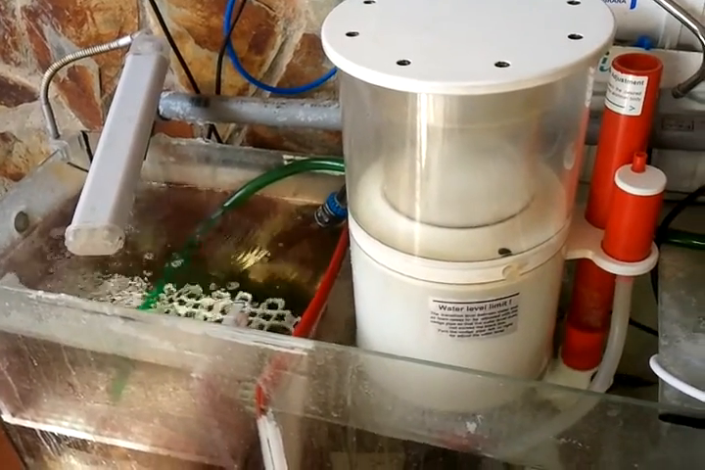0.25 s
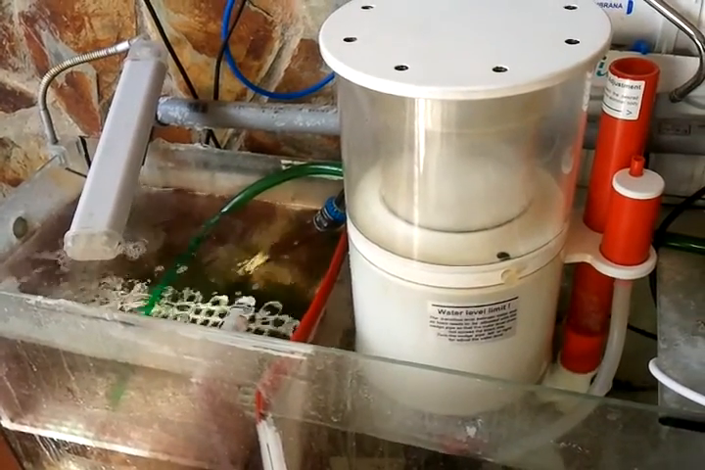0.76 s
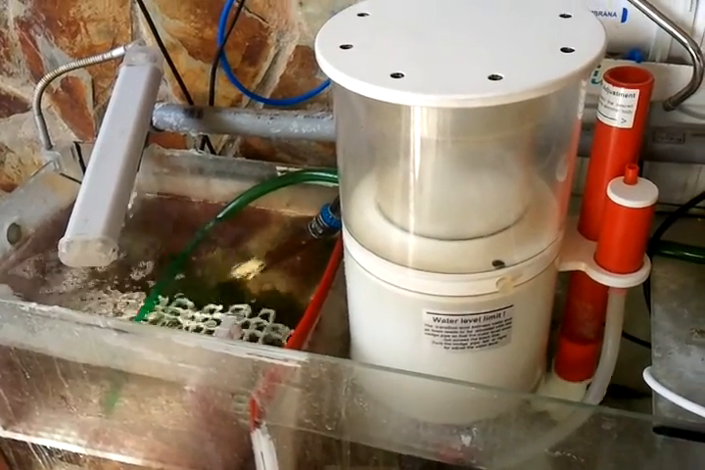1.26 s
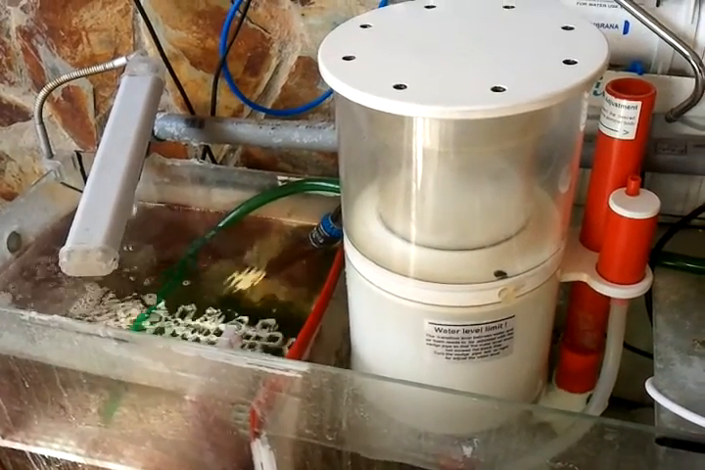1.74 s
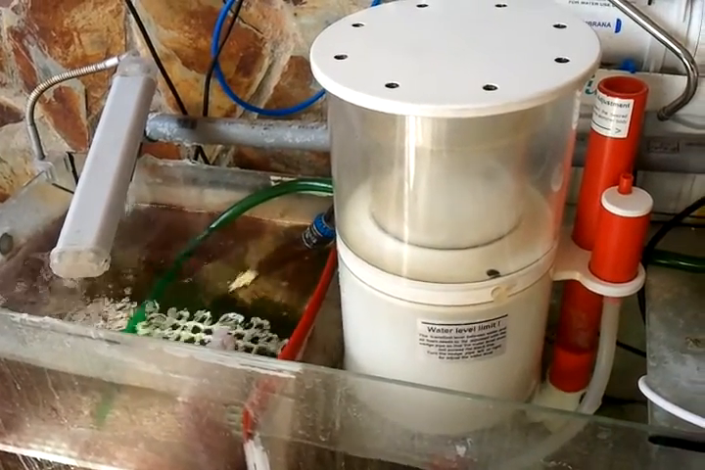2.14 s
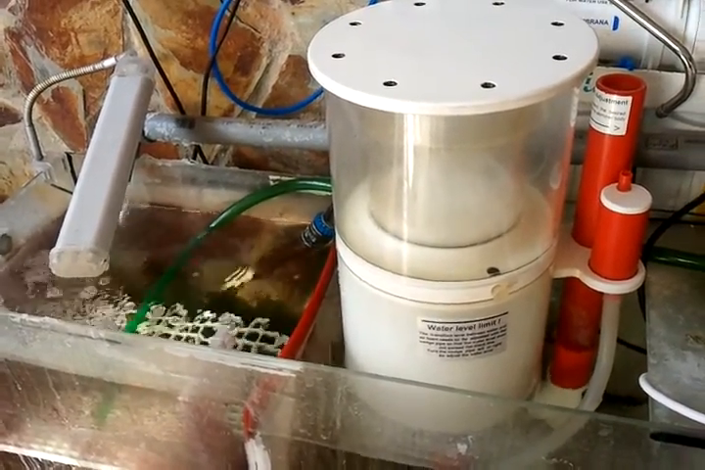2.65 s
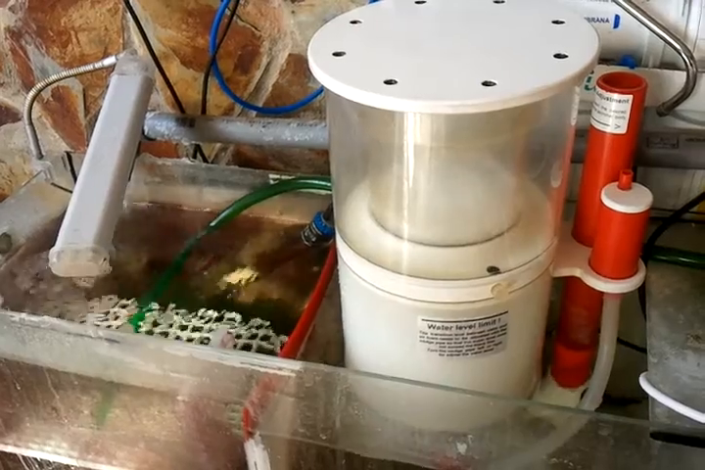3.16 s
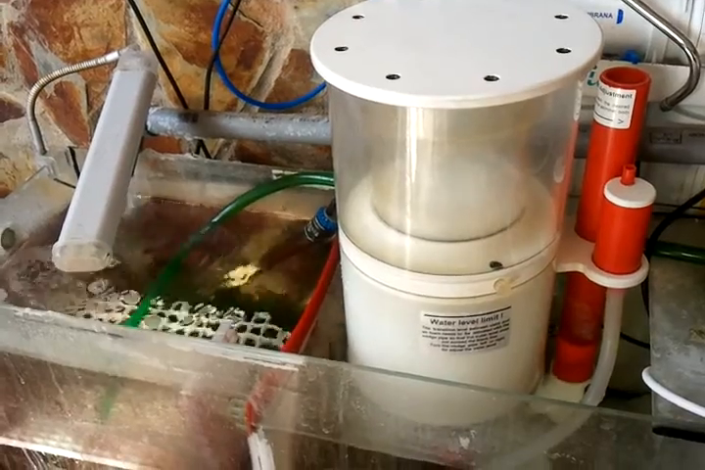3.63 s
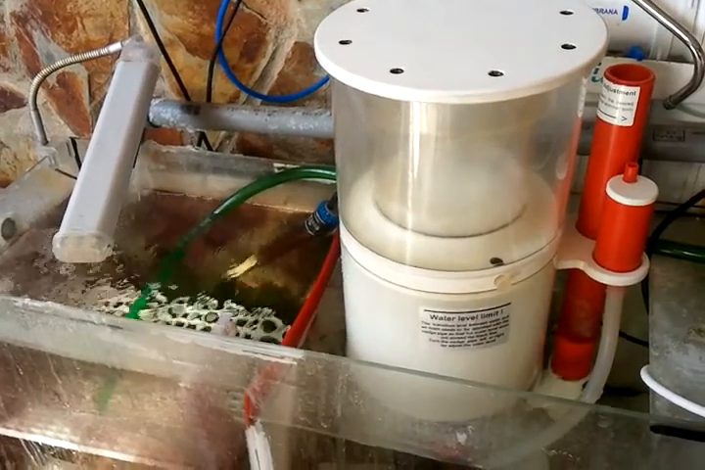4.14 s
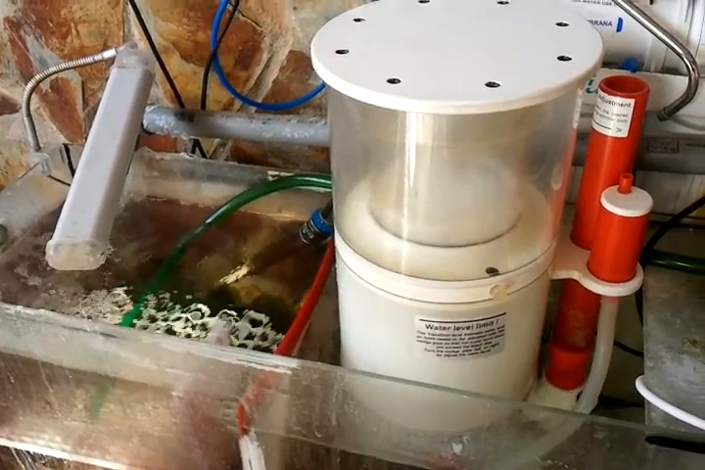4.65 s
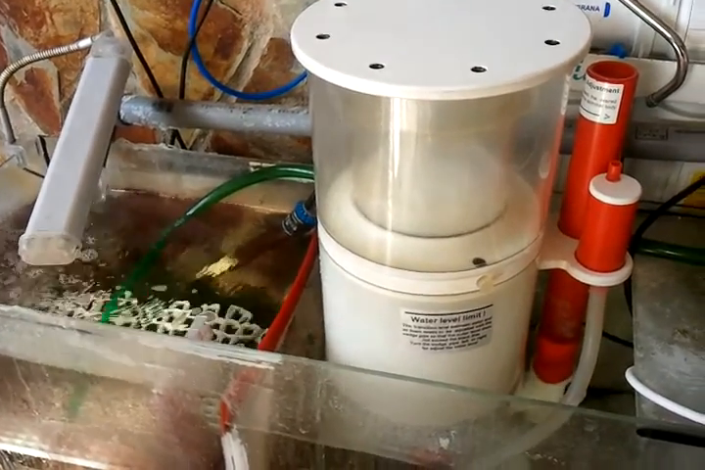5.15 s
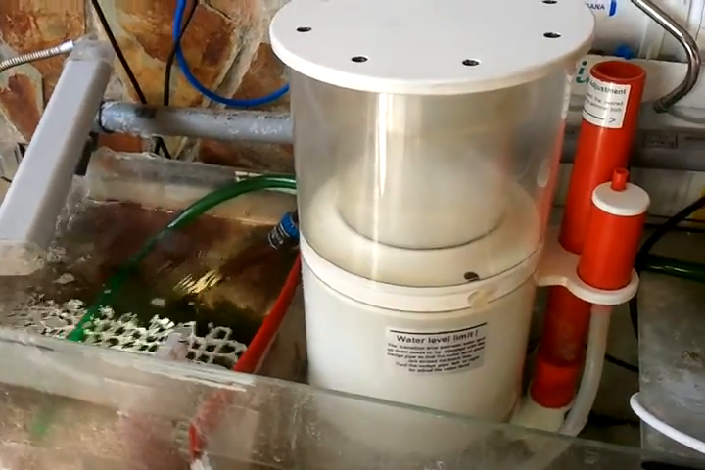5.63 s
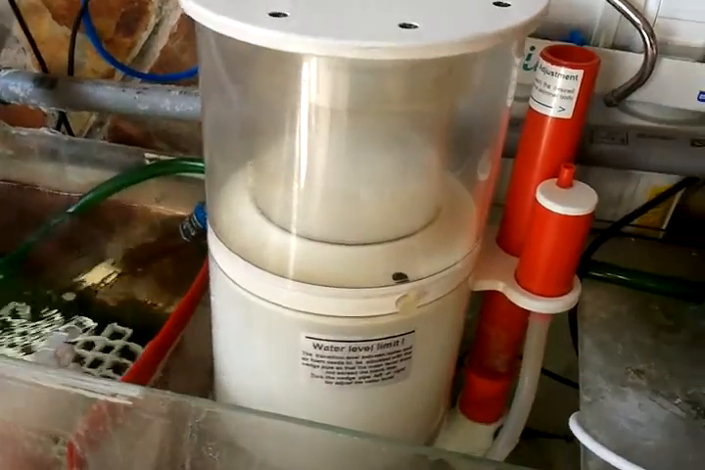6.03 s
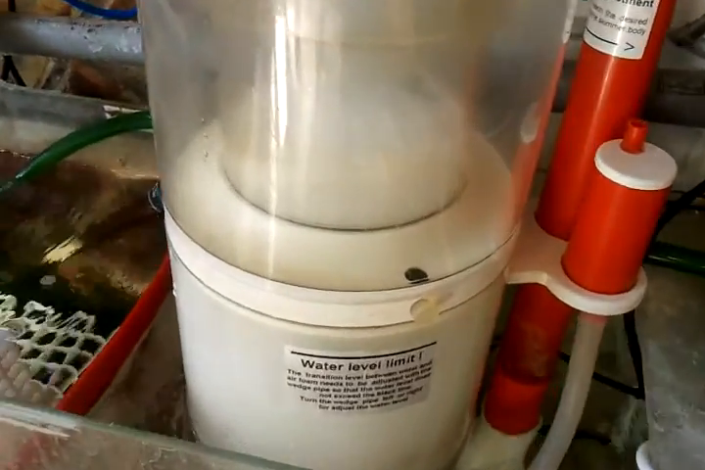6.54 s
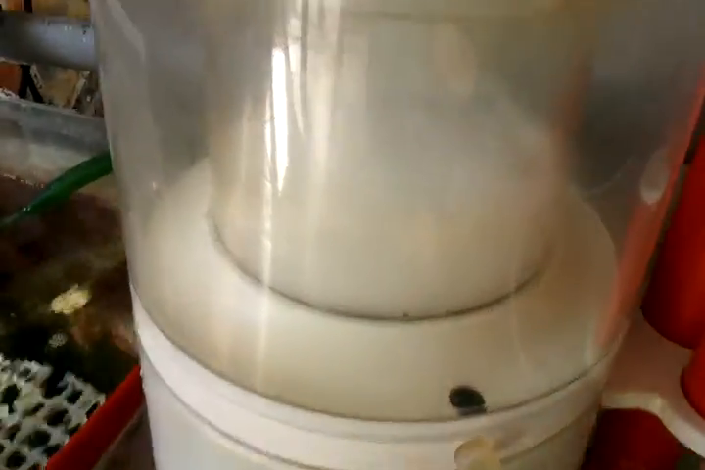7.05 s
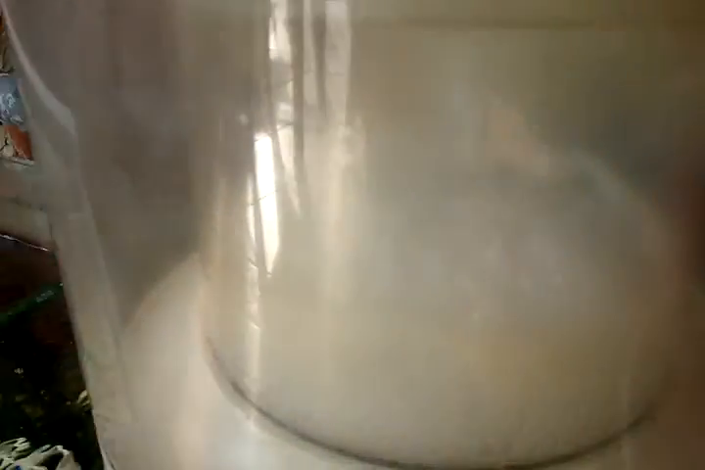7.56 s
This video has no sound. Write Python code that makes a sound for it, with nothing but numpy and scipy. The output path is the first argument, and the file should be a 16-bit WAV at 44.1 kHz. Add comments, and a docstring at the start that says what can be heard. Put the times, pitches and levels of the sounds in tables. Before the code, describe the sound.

Water pours continuously from a drain pipe into an aquarium sump, gurgling in hollow mid-pitched bubbles while bright droplets tick and foam fizzes. A mains pump hums low beneath, with soft cabinet rumble. The microphone stays about a metre away, then moves in towards the foaming column, raising hum, water wash and a hollow roar. Small, hard-walled room.

```python
"""Water gurgles from a drain pipe into an aquarium sump in a small tiled room: air pockets ring as bubbles.
Droplets tick (noise puffs) and trap tiny bubbles; a few only snap. Rush, fizz and foam are patchy noise.
A mains pump adds harmonics, an impeller drone and a panel tone; the cabinet rumbles as low noise.
The microphone drifts nearer the foaming column, faster towards the end: water beds, rumble, pump hum
and panel grow, and a hollow roar comes up."""
import sys
import numpy as np
from scipy import signal
from scipy.fft import rfft, irfft, next_fast_len
from scipy.io import wavfile
from scipy.ndimage import uniform_filter1d, map_coordinates

SR = 44100
rng = np.random.default_rng(int(sys.argv[2]) if len(sys.argv) > 2 else 0)


def unload_wav(signal):
    """Save mono or channel-first audio to the path in sys.argv[1] as 16-bit WAV at rate SR, clipped to [-1, 1]."""
    wavfile.write(
        sys.argv[1],
        SR,
        np.round(np.clip(np.atleast_2d(signal).T, -1, 1) * 32767).astype(np.int16),
    )


N = 343539

# air pockets at the pipe mouth: (time [s], peak level [dB], pitch [Hz])
AIR_POCKETS = [(.046, -31.5, 1024), (.0463, -36.5, 1500), (.322, -35, 955), (.4, -30, 810),
               (.484, -31, 833), (.5771, -35.5, 1270), (.578, -37, 2070), (.66, -38.5, 900),
               (.721, -41, 966), (.756, -37.5, 1040), (.782, -38, 1035), (.82, -36.5, 956),
               (.857, -33.5, 972), (.8914, -37, 2150), (.907, -34.5, 766), (.972, -36.5, 767),
               (1.3738, -32, 2420), (1.463, -37, 793), (1.786, -37.5, 850), (1.836, -38.5, 965),
               (1.8991, -35, 1530), (1.905, -33, 850), (1.996, -34.5, 790), (2.097, -37, 715),
               (2.278, -35, 794), (2.2822, -36.5, 1660), (2.3421, -40.5, 1520), (2.55, -39, 2040),
               (2.651, -33.5, 886), (2.6514, -36, 2344), (2.855, -36.5, 746), (2.871, -34.5, 778),
               (2.974, -36.5, 1255), (3.035, -34, 820), (3.095, -36, 730), (3.473, -39, 2030),
               (4.086, -27.5, 820), (4.457, -37, 1150), (4.544, -34, 730), (4.562, -35.5, 800),
               (4.693, -33.5, 754), (4.734, -36.5, 856), (4.759, -36, 844), (4.877, -38.5, 826),
               (4.923, -34.5, 923), (5.135, -37, 1148), (5.205, -30.5, 1000), (5.4774, -35.5, 1302),
               (5.88, -34, 1140), (5.982, -34.5, 1330), (5.9838, -33, 1490), (6.068, -33, 1240),
               (6.248, -31.5, 1085), (6.399, -34.5, 960), (6.56, -33, 970), (6.5829, -38, 1920),
               (6.961, -38.5, 923), (7.016, -34, 850), (7.137, -34.5, 835), (7.279, -30, 890),
               (7.293, -39, 1010), (7.36, -39, 860), (7.5547, -36.5, 1783), (7.6046, -30, 1810),
               (7.62, -33.5, 1790)]


def gurgling():
    """Air pockets pinch off under the pipe mouth and ring; the water closing behind them sloshes."""
    time_s, peak_db, pitch_hz = np.transpose(AIR_POCKETS)
    cycles = 6.9 * (pitch_hz / 800) ** 0.88  # small pockets ring for more cycles
    pockets = bubbles(time_s - .002, peak_db, pitch_hz, cycles, rise=0.042)
    slosh_band = [(300, -20.0), (600, 14), (1800, 12.0), (3500, -2.0), (9000, -6.5)]  # (frequency [Hz], gain [dB])
    puffs = bursts(time_s, peak_db - 7, t60_s=0.031, size=1400)
    slosh = filtered(puffs, lambda hz: amp(along(slosh_band, hz)))
    followers = spray(time_s, peak_db, pitch_hz, cycles=12.8, spread=0.29, count=3)
    small = swarm(count=700, mid_hz=866.0, spread=0.171, db=-49.5, scatter_db=2.0, cycles=7.65, size=900)
    smaller = swarm(count=400, mid_hz=1701, spread=0.308, db=-50, scatter_db=0.0, cycles=20.3, size=700)
    return pockets + slosh + followers + small + smaller


# droplets that trap a bubble: (time [s], peak level [dB], bubble pitch [Hz])
DROPLETS = [(0.045, -30, 7240), (0.151, -27.5, 8000), (.18, -26, 7570), (.377, -22.5, 7680),
            (0.4045, -26, 3800), (0.4983, -32.5, 3900), (0.5281, -21.5, 7340), (0.642, -30, 6200),
            (0.6655, -27.5, 6100), (0.7103, -32.5, 4120), (.808, -35, 7300), (.823, -30.5, 7630),
            (.894, -28.5, 7550), (.925, -25, 7730), (1.0569, -25, 4160), (1.118, -26.5, 7530),
            (1.193, -25, 7300), (1.2159, -20.5, 4110), (1.3602, -22, 3810), (1.361, -24.5, 6100),
            (1.3717, -25, 4280), (1.4432, -23.5, 5570), (1.541, -31.5, 6500), (1.5617, -28.5, 6400),
            (1.626, -26, 4820), (1.8983, -31, 4080), (1.972, -33, 7800), (1.9826, -35.5, 4000),
            (1.995, -29.5, 6370), (2.21, -35, 3600), (2.26, -33, 6200), (2.583, -23.5, 7730),
            (2.7092, -31.5, 7840), (2.7408, -27.5, 6760), (2.822, -29.5, 5870), (2.9742, -22, 7720),
            (3.3228, -39, 3830), (3.335, -33, 3700), (3.362, -29.5, 7600), (3.65, -35.5, 3670),
            (4.1069, -29.5, 5800), (4.14, -24.5, 3730), (4.274, -30, 5000), (4.295, -30, 6700),
            (4.4294, -26.5, 7240), (4.491, -33, 3270), (4.692, -31.5, 7430), (5.0343, -26.5, 7570),
            (5.3381, -30, 4070), (5.364, -21, 6620), (5.4003, -30, 6460), (5.439, -26.5, 5870),
            (5.478, -30, 5400), (5.538, -22, 7500), (5.644, -25.5, 7830), (5.751, -32.5, 3550),
            (5.7602, -23.5, 7560), (5.793, -23, 6300), (5.9698, -27.5, 6500), (5.9818, -24.5, 5400),
            (6.0267, -28.5, 4650), (6.0363, -29.5, 4370), (6.1424, -20, 7940), (6.1614, -26.5, 5000),
            (6.224, -28.5, 3780), (6.2332, -27, 4900), (6.2876, -24, 4800), (6.3692, -25, 5370),
            (6.4047, -29, 5800), (6.584, -28, 4930), (6.6035, -31, 3720), (6.6275, -31.5, 3920),
            (6.6473, -25.5, 5360), (6.773, -31, 5000), (6.983, -31, 5500), (7.1328, -29, 5630),
            (7.222, -30, 7400), (7.363, -37, 6800), (7.405, -31.5, 7300)]


def dripping():
    """Droplets tick and trap ringing bubbles; tiny bubbles and foam cells pop all the while at chance moments."""
    time_s, peak_db, pitch_hz = np.transpose(DROPLETS)
    tick = bursts(time_s, peak_db, t60_s=0.019, size=900)
    tick = filtered(tick, lambda hz: np.clip(hz / 3500, 0, 1) ** 2)
    trapped = bubbles(time_s - .0006, peak_db, pitch_hz, 9.9, rise=0.021, size=400)
    followers = spray(time_s, peak_db - 3.5, pitch_hz, cycles=21.6, spread=0.5, count=6)
    tiny = swarm(count=2500, mid_hz=5960, spread=0.376, db=-45, scatter_db=3.5, cycles=5.66, size=200)
    tiny = tiny * amp(2.3 * splashing_db())
    foam_pops = swarm(count=900, mid_hz=8130, spread=0.061, db=-39, scatter_db=1, cycles=5.9, size=200)
    return tick + trapped + followers + tiny + foam_pops


# droplets that burst without a bubble: (time [s], peak level [dB])
SNAP_HITS = [(0.0455, -33), (1.2147, -23), (1.265, -33), (3.134, -30), (4.8095, -20), (5.9838, -19),
             (7.466, -26)]


def snapping():
    """A bursting droplet gives a pulse of about one 4 kHz cycle."""
    time_s, peak_db = np.transpose(SNAP_HITS)
    return bubbles(time_s, peak_db, np.full(len(time_s), 4000), 2.2, rise=.5, size=100)


# noise spectra of the stream's body, fizz and bursting foam: (frequency [Hz], relative density [dB per Hz])
RUSH_SPECTRUM = [(150, -57), (330, -8.5), (480, -1.5), (820, -2.5), (1200, -4.5), (2000, -5), (2700, -13.5),
                 (3600, -25.5), (8000, -120)]
FIZZ_SPECTRUM = [(1200, -69.5), (2500, -2.5), (3100, -2.5), (3880, 3), (4600, -2.5), (6300, 3), (7100, -4),
                 (8600, -8.5), (9600, -11)]
FOAM_SPECTRUM = [(5000, -45), (7000, -15), (7600, 12), (8200, 7), (9600, -18)]


def stream():
    """Body of the stream, fine fizz and foam hiss: noise beds sharing one random surge."""
    surge_db = wobble(28)
    rush_db = bed_db(-52, near=0.91, splash=.3) + surge_db
    fizz_db = bed_db(-49.5, near=0.69, splash=0.81) + surge_db
    foam_db = bed_db(-58, near=2.05, splash=.2) + 0.46 * surge_db + 0.43 * wobble(40)
    rush = amp(rush_db) * noise(RUSH_SPECTRUM, patchy_db=1.3)
    fizz = amp(fizz_db) * noise(FIZZ_SPECTRUM, patchy_db=1.57)
    foam = amp(foam_db) * noise(FOAM_SPECTRUM, patchy_db=4.0)
    return rush + fizz + foam


# hollow roar inside the column: (frequency [Hz], relative density [dB per Hz])
COLUMN_SPECTRUM = [(250, -60.5), (390, -8.5), (450, 0), (540, -8), (800, -60)]


def column_roar():
    """Narrow noise near 450 Hz that grows steeply as the microphone nears."""
    return amp(bed_db(-73.5, near=3.2, splash=0)) * noise(COLUMN_SPECTRUM, patchy_db=1.5)


# how hard the stream splashes: (time [s], level [dB])
SPLASH_CURVE = [(0, 0.5), (.45, 0.5), (1.4, 0.7), (1.8, -1.5), (2.85, 0), (3.6, -1.5), (4.6, 0),
                (5.3, -0.3), (6.15, 0), (6.7, -1.4), (7.79, 2.1)]


def splashing_db():
    """Splash strength per sample; each layer takes its own share."""
    return curves(SPLASH_CURVE)[0]


# microphone to foaming column: (time [s], distance [m])
MIC_DISTANCE = [(0, 0.94), (5.2, 0.86), (6.3, 0.7), (7, 0.56), (7.79, 0.46)]


def nearness_db():
    """Inverse-distance gain from coming closer than 1 m."""
    return -20 * np.log10(curves(MIC_DISTANCE)[0])


def bed_db(rms_db_at_1m, near, splash):
    """Bed level with its shares of the nearness gain and of the splashing."""
    return rms_db_at_1m + near * nearness_db() + splash * splashing_db()


# pump harmonics at 1 m: (multiple of mains [1], rms level [dB])
HUM_HARMONICS = [(2, -57.5), (3, -64), (4, -57.5), (6, -60), (7, -67), (9, -71), (13, -67), (23, -66)]


def mains_hum():
    """Harmonics of 50 Hz mains, each wavering in level and phase, louder from nearby."""
    mains_hz, t = 50, np.arange(N) / SR
    hum = np.zeros(N)
    for multiple, rms_db in HUM_HARMONICS:
        phase = 2 * np.pi * multiple * mains_hz * t + 0.27 * wobble(3.3)
        hum += amp(rms_db + 2.2 * wobble(2.755)) * np.sin(phase)
    return np.sqrt(2) * amp(0.78 * nearness_db()) * hum


# impeller under changing load: (time [s], pitch [Hz], rms level [dB])
IMPELLER = [(0, 65.45, -72), (.6, 64, -45.5), (2, 63, -51.5), (2.6, 60.64, -53), (5.8, 60, -50),
            (6.4, 60.8, -45.5), (6.9, 59.2, -54), (7.3, 60.8, -44.5), (7.79, 60, -55)]


def impeller_drone():
    """One sine follows the impeller's gliding pitch and level."""
    pitch_hz, rms_db = curves(IMPELLER)
    phase = 2 * np.pi * np.cumsum(pitch_hz) / SR + 0.4 * wobble(2.5)
    return np.sqrt(2) * amp(rms_db + 0.6 * wobble(1.1)) * np.sin(phase)


def panel_buzz():
    """A panel sounds as a wavering 145.5 Hz sine, louder from nearby."""
    phase = 2 * np.pi * 145.5 * np.arange(N) / SR + 0.69 * wobble(5.4)
    rms_db = -59.5 + 2.1 * wobble(4) + 1.5 * nearness_db()
    return np.sqrt(2) * amp(rms_db) * np.sin(phase)


# cabinet: (frequency [Hz], relative density [dB per Hz])
RUMBLE_SPECTRUM = [(12, -16.5), (22, -10.5), (32, -3), (50, -1.5), (80, -9.5), (120, -13), (146, -10.5),
                   (175, -16), (260, -15), (380, -23), (600, -30.5), (1500, -120)]


def cabinet_rumble():
    """Low noise, strongest around 30-50 Hz."""
    return amp(bed_db(-45, near=0.62, splash=.05)) * noise(RUMBLE_SPECTRUM, patchy_db=0.5)


# reverberation: (frequency [Hz], t60 [s])
ROOM_T60 = [(500, 0.18), (2500, 0.42), (8000, 0.017)]


def room(x):
    """Hard walls answer with a decaying noise tail, drawn anew every quarter second."""
    out, step = np.zeros(N + SR), SR // 4
    for start in range(0, N, step):
        hz, t, z = signal.stft(rng.standard_normal(SR // 3), SR, nperseg=256)
        decay_db = -60 * t / along(ROOM_T60, hz)[:, None]
        tail = signal.istft(z * amp(decay_db), SR, nperseg=256)[1]
        wet = signal.fftconvolve(x[start:start + step], tail / np.linalg.norm(tail))
        out[start + 100:][:len(wet)] += wet  # 100 samples of pre-delay
    return out[:N]


def bubbles(time_s, peak_db, hz, cycles, rise, size=1400):
    """Each bubble swells, rings for some cycles while its pitch climbs, and dies."""
    t = np.arange(size) / SR
    lives = t * (hz / cycles)[:, None]  # age in lives
    shape = (np.e * 3 * lives * np.exp(-3 * lives)) ** 2.0
    ring = np.sin(2 * np.pi * hz[:, None] * t * (1 + rise * lives / 2))
    return placed(time_s, amp(peak_db)[:, None] * shape * ring)


def bursts(time_s, db, t60_s, size):
    """Short puffs of white noise: quick onset, exponential decay."""
    t = np.arange(size) / SR
    shape = amp(-60 * t / t60_s) * (1 - np.exp(-t / 0.00094))
    return placed(time_s, amp(db)[:, None] * shape * rng.standard_normal((len(time_s), size)))


def placed(time_s, waves):
    """Sum the rows of waves, each starting at its time."""
    size = waves.shape[1]
    at = (time_s * SR).astype(int)[:, None] + np.arange(size)
    return np.bincount(at.ravel(), waves.ravel(), N + size)[:N]


def swarm(count, mid_hz, spread, db, scatter_db, cycles, size):
    """Many bubbles at chance moments; with scatter, a few are much louder than the rest."""
    when, chance = rng.random((count, 2)).T
    hz = np.clip(mid_hz * np.exp(spread * rng.standard_normal(count)), 450, 8500)
    peak_db = np.minimum(db - scatter_db * np.log(chance), db + 5.5)
    return bubbles(when * N / SR, peak_db, hz, cycles, rise=0.1, size=size)


def spray(time_s, db, hz, cycles, spread, count):
    """Each plunge leaves weaker bubbles of like pitch soon after, weaker the later they come."""
    late, detune, weakness = np.transpose(rng.random((len(time_s), count, 3)), (2, 0, 1))
    delay_s = .004 + .07 * late ** 1.5
    peak_db = db[:, None] - 7 - 110 * delay_s - 8 * weakness
    pitch_hz = np.clip(hz[:, None] * np.exp(spread * (detune - .5)), 450, 8500)
    when_s = np.minimum(time_s[:, None] + delay_s, N / SR)
    return bubbles(when_s.ravel(), peak_db.ravel(), pitch_hz.ravel(), cycles, rise=.08, size=900)


def noise(spectrum, patchy_db):
    """Coloured noise of rms 1 with time-frequency patches of random gain."""
    z = signal.stft(rng.standard_normal(N), nperseg=512)[2]
    field = uniform_filter1d(rng.standard_normal(z.shape), size=8, axis=0)
    field = uniform_filter1d(field, size=6, axis=1)
    x = signal.istft(z * amp(patchy_db * unit(field)), nperseg=512)[1][:N]
    return unit(filtered(x, lambda hz: amp(along(spectrum, hz))))


def wobble(rate_hz):
    """A smooth random curve through rate_hz knots a second."""
    knots = rng.standard_normal(int(N * rate_hz / SR) + 4)
    return map_coordinates(knots, [np.arange(N) * rate_hz / SR])


def filtered(x, response):
    """x times a zero-phase response of frequency."""
    m = next_fast_len(N + SR // 2)
    return irfft(rfft(x, m) * response(np.fft.rfftfreq(m, 1 / SR)), m)[:N]


def along(points, hz):
    """Interpolate (Hz, value) points on a log-frequency axis."""
    f, v = np.transpose(points)
    return np.interp(np.log(hz + 1), np.log(f + 1), v)


def curves(rows):
    """One value per sample for each column after the time."""
    time_s, *columns = np.transpose(rows)
    return [np.interp(np.arange(N) / SR, time_s, column) for column in columns]


def amp(db):
    """Decibels to amplitude."""
    return 10 ** (np.asarray(db) / 20)


def unit(x):
    """Scale to rms 1."""
    return x / np.sqrt(np.mean(x ** 2) + 1e-20)


def scene():
    """Gurgles and drips, dry and in the room, over the water beds, pump and cabinet."""
    low, high = gurgling(), dripping() + snapping()
    wet = room(amp(-9) * low + amp(-9.5) * high)
    water = low + high + wet + stream() + column_roar()
    pump = mains_hum() + impeller_drone() + panel_buzz()
    return (water + pump + cabinet_rumble())[None]


# microphone response: (frequency [Hz], gain [dB])
MIC_RESPONSE = [(300, -1), (7700, -1.5), (8300, -7), (8800, -26.5), (9600, -60.5)]


def record(dry):
    """The microphone rolls off on top; the converter's DC offset settles slowly."""
    top_hz = 8920  # nothing passes from here up
    x = filtered(dry[0], lambda hz: amp(along(MIC_RESPONSE, hz)) * (hz < top_hz))
    offset_start, offset_end, settle_s = .075, .048, 5.6
    offset = offset_end + (offset_start - offset_end) * np.exp(-np.arange(N) / SR / settle_s)
    return (x + offset)[None]


dry = scene()
out = record(dry)
unload_wav(out)
```